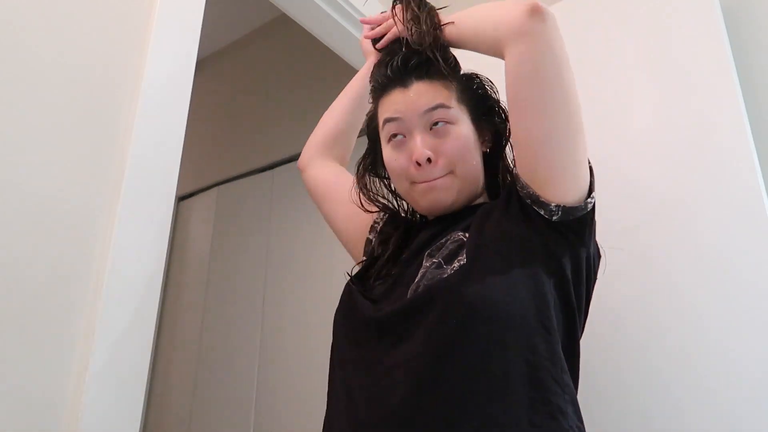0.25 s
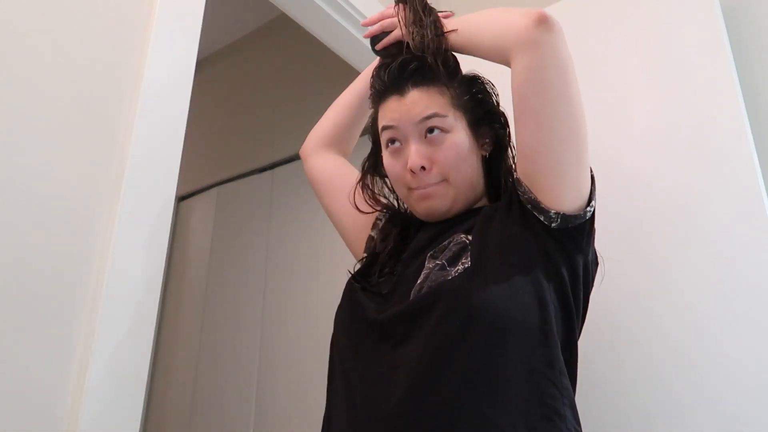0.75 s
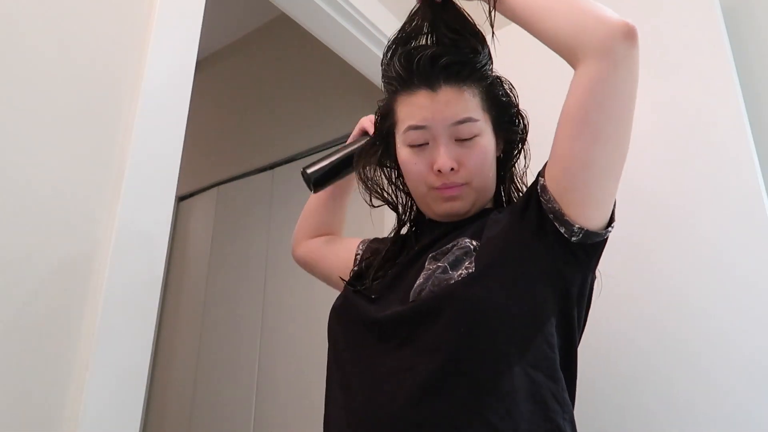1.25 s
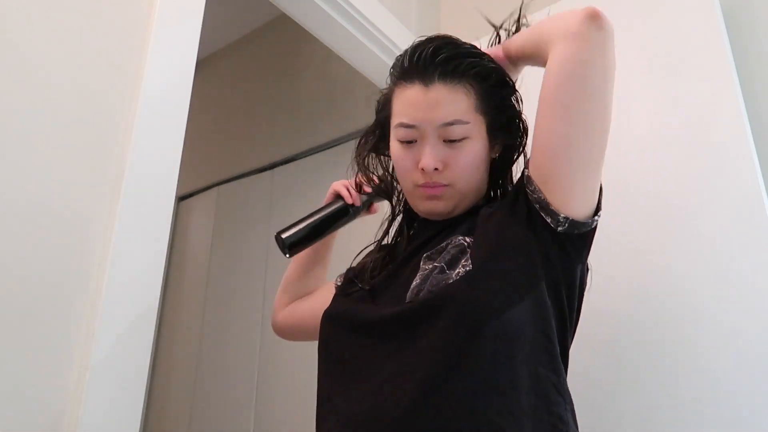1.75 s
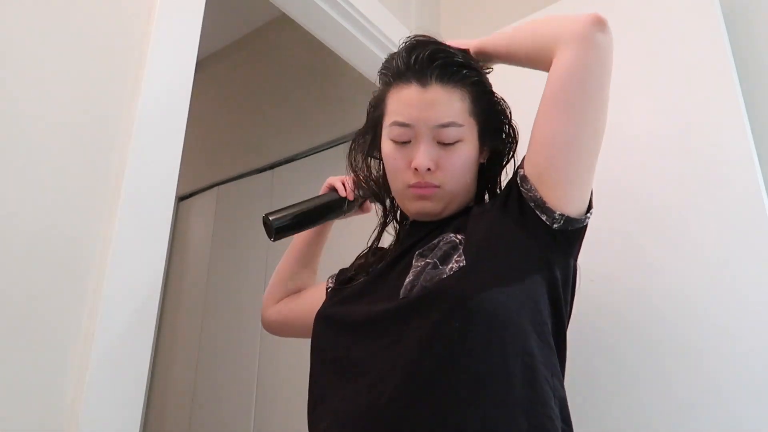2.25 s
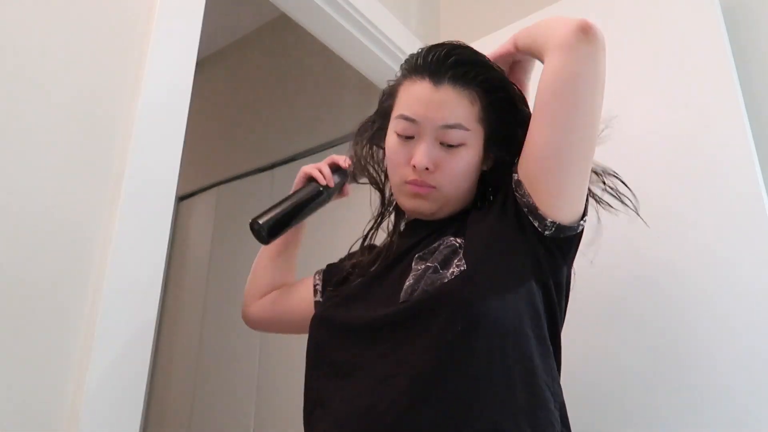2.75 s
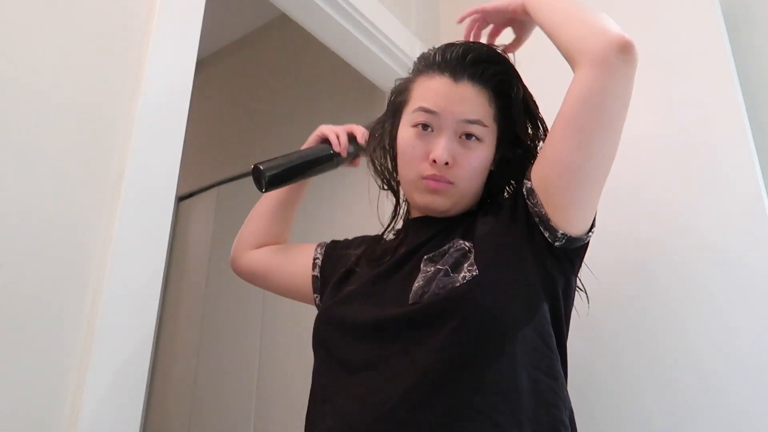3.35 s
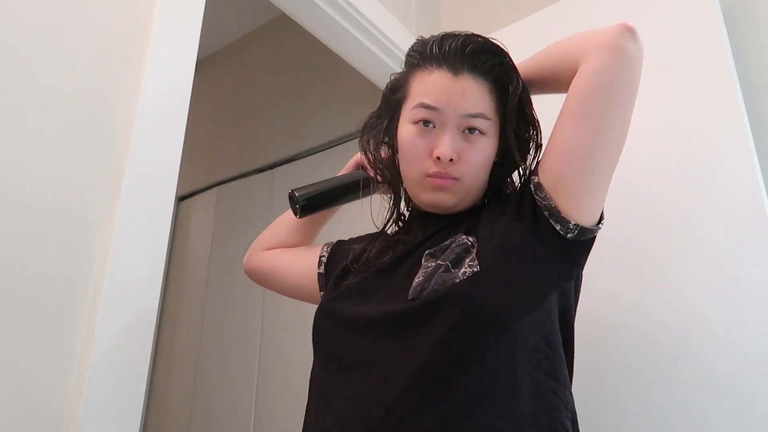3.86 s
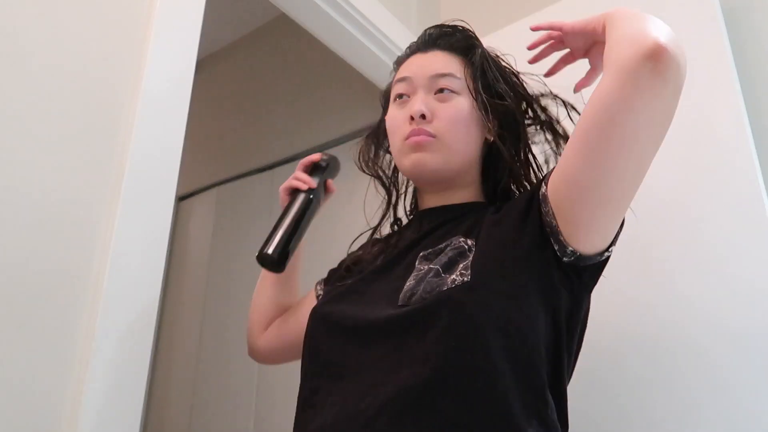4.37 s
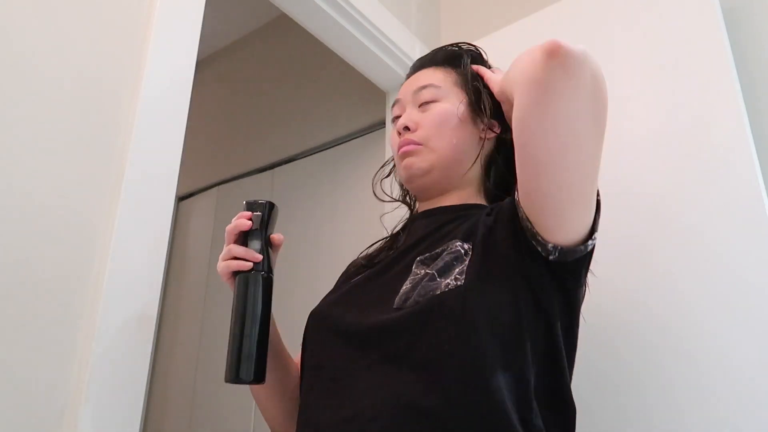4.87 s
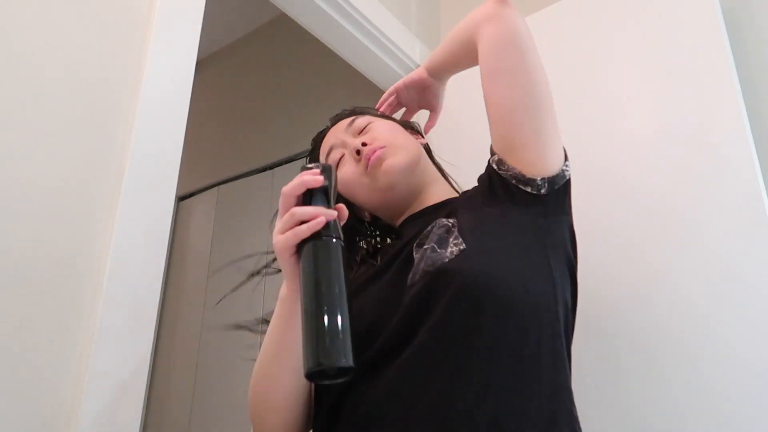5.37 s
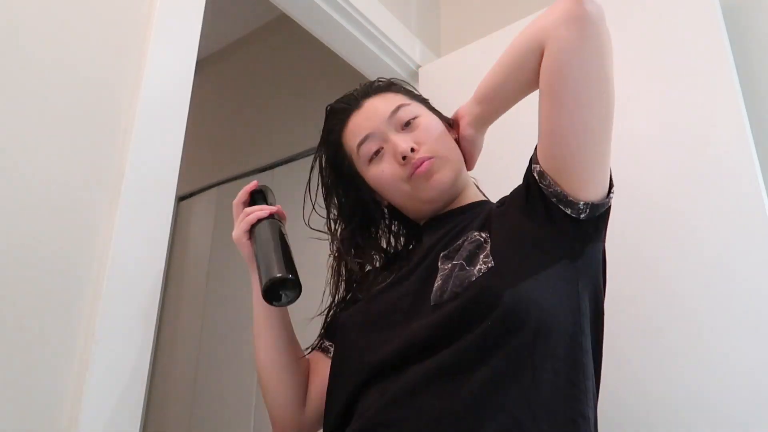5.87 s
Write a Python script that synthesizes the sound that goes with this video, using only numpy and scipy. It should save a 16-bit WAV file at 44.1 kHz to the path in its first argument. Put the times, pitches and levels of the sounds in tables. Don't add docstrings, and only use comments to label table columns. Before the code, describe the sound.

In a small humming room, a plastic spray bottle clacks, hisses out continuous fine mist for about three seconds, then stops amid light fumbling taps.

```python
import sys
import numpy as np
from scipy import signal
from scipy.fft import rfft, irfft, next_fast_len
from scipy.io import wavfile
from scipy.ndimage import uniform_filter1d, map_coordinates

SR = 44100
rng = np.random.default_rng(int(sys.argv[2]) if len(sys.argv) > 2 else 0)


def invert_db(x):
    u = np.asarray(x, float) / 20
    return 10 ** u


def put_to_file(sound):
    columns = np.atleast_2d(sound).T
    safe = np.clip(columns, -1, 1)
    whole_steps = np.round(safe * 32767)
    wavfile.write(sys.argv[1], SR, whole_steps.astype(np.int16))


N = 269873

# (frequency [Hz], level [dB rms], unsteadiness [ratio and rad])
FAN_LINES = [(59.8, -63.5, 0.17), (119.95, -43.5, 0.036), (179.8, -69, 0.1)]
# (time [s], level [dB])
FAN_DRIFT = [(0.0, -43.5), (1.74, -45), (4.84, -43.5), (5.3, -44), (5.69, -43), (6.12, -44)]
# (frequency [Hz], level [dB per Hz])
FAN_RUMBLE = [(8.8, -39), (15, -2.5), (65, -4.5), (118, -8.5), (148, -5.5), (173, -13.5), (260, -10),
              (340, -50), (570, -120)]
# (frequency [Hz], width [Hz], level [dB])
BEARING_MODES = [(1390, 430, 0)]
# (frequency [Hz], level [dB per Hz])
AIR_SPECTRUM = [(76, -16.5), (130, -4), (397, 0), (536, -5), (592, -5.5), (901, -8.5), (995, -10.5),
                (1100, -12.5), (2250, -15), (3360, -17), (3860, -16.5), (12500, -34), (14100, -40),
                (15300, -36)]
# (delay [s], level [dB])
WALL_ECHOES = [(.0033, -6.5), (.0071, -7), (.0118, -9), (.0186, -7.5)]
# (frequency [Hz], difference over sum [dB])
PORT_DIFFERENCE = [(300, -16), (1000, -26), (2400, -8), (4400, -1), (6500, 10), (9000, 13), (12000, 21),
                   (15000, 22.5)]

# (frequency [Hz], width [Hz], level [dB])
CAVITY_MODES = [(415, 85, -1)]
# (frequency [Hz], width [Hz], level [dB])
WALL_MODES = [(656, 180, -11), (805, 110, -3.5), (897, 107, 1.5), (985, 94, 4), (1120, 118, 1.5),
              (1366, 420, -1.5)]
# (frequency [Hz], width [Hz], level [dB])
TRIGGER_MODES = [(1784, 650, -10.5), (2070, 144, 2), (2310, 254, -2)]
# (frequency [Hz], width [Hz], level [dB])
HEAD_MODES = [(2676, 320, 4.5), (3090, 440, 1), (3470, 530, 1.5), (4370, 2050, -5.5)]
# (frequency [Hz], width [Hz], level [dB])
SNAP_MODES = [(4450, 2200, 0.5), (6900, 2900, -5), (8080, 2600, -5.5), (10200, 2100, -11.5)]

# (frequency [Hz], level [dB per Hz])
MIST_SUM = [(700, -30), (1300, -11.5), (1750, -8), (2100, -5), (2750, -2.5), (3700, -5.5), (4500, -8.5),
            (5400, -6.5), (6500, -12), (8000, -15), (10000, -18), (11500, -21.5), (13000, -28.5),
            (16000, -28)]
# (frequency [Hz], level [dB per Hz])
MIST_DIFFERENCE = [(710, -46), (1200, -69), (1500, -64), (1880, -12), (2400, -7), (2780, -24), (3000, -18),
                   (3790, 4.5), (5560, 7.5), (8800, 5), (11500, 5.5), (12600, 5.5), (15300, -7)]

# (time [s], frequency [Hz], level [dB], decay by 60 dB [s])
LOOSE_GULPS = [(.574, 544, -44, 0.16), (.783, 546, -33, 0.079), (0.791, 379, -43.5, 0.22),
               (1.203, 290, -40, 0.21), (1.235, 415, -44.5, 0.14)]
# (time [s], wall peak [dB], wall pitch [Hz], trigger
# over wall [dB], head over wall [dB])
HAND_KNOCKS = [(0.157, -46, 767, -4.5, -4.5), (0.175, -44.5, 1140, -18, -5), (0.33, -42, 980, -12, -17),
               (0.338, -28.5, 940, -15.5, -2.5), (.374, -42, 940, -8, -19), (.411, -47, 940, -18, -13),
               (0.777, -44, 900, -6, -3), (0.781, -22, 805, -7, -11.5), (0.818, -29, 915, -22, -18),
               (0.926, -42, 1040, -9, -6.5), (1.045, -39.5, 775, -11.5, -6.5), (1.082, -42.5, 890, -12, -8),
               (4.708, -40, 1115, -6.5, -19), (4.763, -37.5, 820, -16, -6), (4.93, -49, 1320, -20, -11),
                 (4.976, -53, 1320, -20, -3.5), (4.949, -45.5, 1320, -28, -13),
                 (5.222, -43.5, 1140, -7, -3.5), (5.308, -37, 1046, -4, -8), (5.422, -48, 1150, 0, -4.5),
                 (5.461, -35, 1040, -12.5, -16), (5.527, -46, 1150, -7, 1.5), (5.582, -48, 1200, -11, -12),
                 (5.72, -51.5, 1320, -20, -4), (5.733, -52, 1330, -19, -7), (5.751, -55, 1320, -20, -7),
                 (5.788, -34, 824, -14, -6), (5.905, -50.5, 869, -7, -5), (5.966, -36.5, 1320, -2.5, -5.5)]
# (time [s], wall peak [dB], wall pitch [Hz], trigger over wall [dB], head over wall [dB])
TRIGGER_SQUEEZES = [(0.515, -54, 890, -3, -2), (0.55, -43.5, 880, -5, -6), (0.575, -31.5, 834, -10.5, -11),
                    (0.659, -45, 850, -14, -10), (0.72, -38.5, 815, -8, -7), (4.695, -52, 1010, 0, -1),
                    (4.819, -40, 1270, -5.5, -19)]
# (time [s], wall peak [dB], wall pitch [Hz], head over wall [dB], cavity thump [dB])
PUMP_STROKES = [(1.391, -30.5, 1240, -6.5, -43.5), (1.644, -37, 950, 3, -41.5),
                (1.906, -33.5, 1060, -26, -49.5), (2.195, -40.5, 985, -14, -66),
                (2.566, -34, 1050, -5, -40), (2.826, -33.5, 1120, -1.5, -46.5),
                (3.108, -35, 1120, -23, -46), (3.403, -32.5, 920, -4.5, -43.5),
                (3.667, -35, 1130, -2.5, -56), (3.958, -36, 1120, -2, -51), (4.266, -35.5, 1014, -5, -52)]
# (time [s], wall peak [dB], wall pitch [Hz], head over wall [dB])
LEVER_RATTLES = [(1.142, -43.5, 970, -1), (1.152, -44.5, 970, 3.5), (1.175, -46.5, 970, 6),
                 (1.773, -36.5, 1030, -0.5), (1.941, -37.5, 1020, -0.5), (2.07, -40, 950, 2),
                 (2.448, -45, 980, -5), (2.523, -36, 996, -2), (2.671, -39, 1100, -14),
                 (2.908, -36.5, 930, -5), (2.974, -39, 910, -7), (3.132, -36.5, 890, -3.5),
                 (3.294, -45.5, 930, 4), (3.328, -44, 1070, -1), (3.368, -36, 990, -2.5),
                 (3.529, -50, 1000, 0), (3.562, -39.5, 985, -14), (3.582, -42.5, 865, -1),
                 (3.691, -37.5, 991, -20), (3.861, -35, 1000, -7.5), (4, -41, 993, -7),
                 (4.12, -42, 1150, -20), (4.24, -33, 1200, -12), (4.29, -38, 1010, -0.5),
                 (4.308, -45, 1000, -4.5)]

OPEN_S, ATTACK_S, CLOSE_S, SHUT_DB = 1.125, 0.05, 4.2, -22.5


def unit(x):
    return x / np.sqrt(np.mean(x ** 2) + 1e-20)


def along(points, hz):
    f, v = np.transpose(points)
    return np.interp(np.log(hz + 1), np.log(f + 1), v)


def curves(rows):
    s, *cols = np.transpose(rows)
    t = np.arange(N) / SR
    return [np.interp(t, s, c, -120, -120) for c in cols]


def wobble(rate):
    knots = rng.standard_normal(int(N * rate / SR) + 4)
    return map_coordinates(knots, [np.arange(N) * rate / SR])


def filtered(x, response):
    m = next_fast_len(N + SR // 2)
    gain = response(np.fft.rfftfreq(m, 1 / SR))
    gain = gain / np.sqrt(np.mean(np.abs(gain) ** 2))
    return irfft(rfft(x, m) * gain, m)[..., :N]


def modes(table, order=2):
    def response(f):
        total = 0
        for k, (centre, width, db) in enumerate(table):
            damping = 1j * f * width
            resonance = damping / (centre * centre - f * f + damping)
            total = total + invert_db(db) * resonance ** order * (-1) ** k
        return total
    return response


def colour(points):
    return lambda f: invert_db(along(points, f))


def noise(patchy_db):
    z = signal.stft(rng.standard_normal((2, N)), nperseg=512)[2]
    field = rng.standard_normal(z.shape[1:])
    field = uniform_filter1d(uniform_filter1d(field, 6, 0), 10, 1)
    patchy = z * invert_db(patchy_db * unit(field))
    return unit(signal.istft(patchy, nperseg=512)[1][:, :N])


def fan():
    t = np.arange(N) / SR
    lines = 0
    for hz, db, unsteady in FAN_LINES:
        swell = 1 + unsteady * wobble(7.0)
        phase = 2 * np.pi * hz * t + 0.97 + unsteady * wobble(4.9)
        lines = lines + np.sqrt(2) * invert_db(db) * swell * np.sin(phase)
    drift = invert_db(curves(FAN_DRIFT)[0] + 44.5)
    rumble = filtered(rng.standard_normal(N), colour(FAN_RUMBLE))
    return drift * lines + invert_db(-56.0 + 2.23 * wobble(1.406)) * rumble


def bearing():
    return invert_db(-63 + 3.3 * wobble(13)) * filtered(noise(patchy_db=5), modes(BEARING_MODES))


def air():
    return invert_db(-53.5) * filtered(noise(patchy_db=1.6), colour(AIR_SPECTRUM))


def valve(tail_s):
    return curves([(OPEN_S, SHUT_DB), (OPEN_S + ATTACK_S, 0), (CLOSE_S, 0), (CLOSE_S + tail_s, SHUT_DB)])[0]


def surges(lag_s):
    u = np.arange(SR // 2) / SR / 0.034
    at = [round((row[0] + lag_s) * SR) for row in PUMP_STROKES]
    return signal.fftconvolve(np.bincount(at, minlength=N), u * np.exp(1 - u))[:N]


def murmur():
    shake_db = -54 + valve(tail_s=0.24) + 2.5 * surges(lag_s=0.17) + 3.4 * wobble(30.13)
    return invert_db(shake_db) * filtered(noise(patchy_db=1.5), modes(CAVITY_MODES + WALL_MODES))


def gulps():
    u = np.arange(SR // 2) / SR
    waver = 0.5 * wobble(40)
    beat_hz = 14
    throb = (1 - np.exp(-u / 0.003)) * (0.082 + 1.38 * np.cos(2 * np.pi * beat_hz * (u - 0.008)))
    answers = [(row[0] + 0.0027, 415, row[-1], 0.25) for row in PUMP_STROKES]
    out = np.zeros(N)
    for s, hz, db, t60 in LOOSE_GULPS + answers:
        start = round(s * SR)
        at = slice(start, start + len(u))
        out[at] += invert_db(db - 60 * u / t60) * throb * np.sin(2 * np.pi * hz * u + waver[at])
    return out


def struck(part, times, db, soft, blow_db, snap, tail_db, t60):
    t = np.arange(SR // 2) / SR
    at = np.round(times * SR).astype(int)
    soft_s, soft_blow_db, soft_gain_db = 0.0087, -3.5, 1
    blows = np.bincount(at, invert_db(db + soft_blow_db * soft), N)
    sharp = np.bincount(at, invert_db(2 * db) * (1 - soft), N)
    cushioned = np.bincount(at, invert_db(2 * (db + soft_gain_db)) * soft, N)
    energy = sharp + uniform_filter1d(cushioned, round(soft_s * SR))

    rattle = invert_db(-60 * t / snap) * (1 - np.exp(-t / 0.00033))
    room = invert_db(tail_db - 60 * t / t60) * (1 - np.exp(-t / 0.0018))
    power = signal.fftconvolve(energy, rattle ** 2 + room ** 2)[:N]
    diffuse = np.sqrt(np.abs(power)) * rng.standard_normal((2, N))

    contact = uniform_filter1d(blows, size=7)
    echoes = sum(invert_db(echo_db) * np.roll(contact, round(lag * SR)) for lag, echo_db in WALL_ECHOES)
    ring = filtered(contact - echoes, modes(part, order=1))
    return filtered(diffuse, modes(part)) - invert_db(blow_db) * ring


def knocks():
    bare = [(*row, 0) for row in HAND_KNOCKS]
    cushioned = [(*row, 1) for row in TRIGGER_SQUEEZES]
    pumped = [(s, db, hz, head - 5.5, head, 1) for s, db, hz, head, *_ in PUMP_STROKES + LEVER_RATTLES]
    s, db, wall_hz, trigger_db, head_db, soft = np.transpose(bare + cushioned + pumped)

    snap_db = -15 + 0.74 * head_db + 0.65 * np.maximum(db + 38, 0) - 5 * soft
    wall = 0
    for centre, width, level in WALL_MODES:
        favour_db = np.maximum(-45 * np.abs(np.log2(wall_hz / centre)), -12)
        wall_db = db + favour_db + level - 6.5
        wall = wall + struck([(centre, width, 0)], s, wall_db, soft,
                             blow_db=15, snap=0.03, tail_db=-7.0, t60=0.36)
    trigger = struck(TRIGGER_MODES, s, db + trigger_db + 1.5, soft,
                     blow_db=16, snap=0.023, tail_db=-10.5, t60=0.37)
    head = struck(HEAD_MODES, s, db + head_db + 0.5, soft, blow_db=16, snap=0.018, tail_db=-11, t60=0.35)
    small = struck(SNAP_MODES, s, db + snap_db + 1.0, soft, blow_db=6, snap=0.021, tail_db=-11, t60=0.33)
    return wall + trigger + head + small


def flow_db():
    t = np.arange(N) / SR
    stall = -10 * np.exp(-((t - 2.275) / 0.032) ** 2)
    sag = 0.01 * (t - OPEN_S)
    return -52.5 + valve(tail_s=0.25) - sag + 0.5 * surges(0) + stall


def mist():
    flutter = invert_db(0.66 * wobble(26.02) + 0.68 * wobble(150))
    both, apart = unit(flutter * noise(patchy_db=2.03))
    hiss = filtered(both, colour(MIST_SUM))
    hiss_apart = invert_db(-3.0) * filtered(apart, colour(MIST_DIFFERENCE))
    return invert_db(flow_db() + 6.5) * np.array([hiss, hiss_apart])


def scene():
    background = air() + bearing()
    body, body_apart = murmur() + knocks()
    hiss, hiss_apart = mist()
    mid = fan() + gulps() + body + hiss
    side = invert_db(11.5) * filtered(body_apart, colour(PORT_DIFFERENCE)) + hiss_apart
    return np.array([mid + side, mid - side]) + background


def band_limit(x):
    return signal.sosfilt(signal.butter(12, 15550, fs=SR, output="sos"), x)


def record(dry):
    top_hz = 15700
    kept = np.sqrt(2 * top_hz / SR) * filtered(dry, lambda hz: hz < top_hz)
    return band_limit(kept)


dry = scene()
out = record(dry)
put_to_file(out)
```